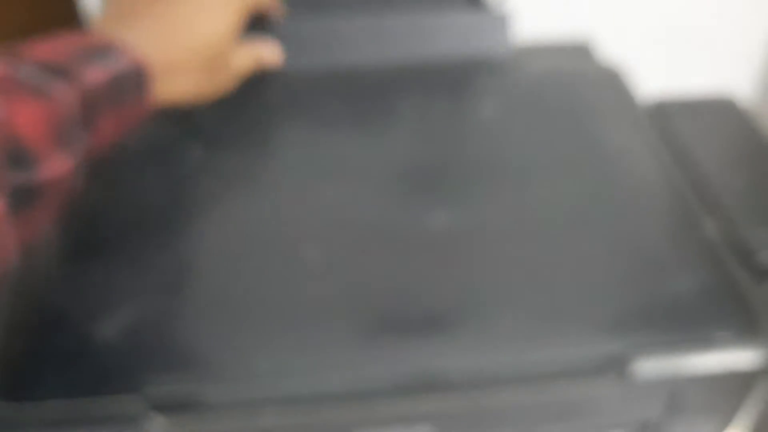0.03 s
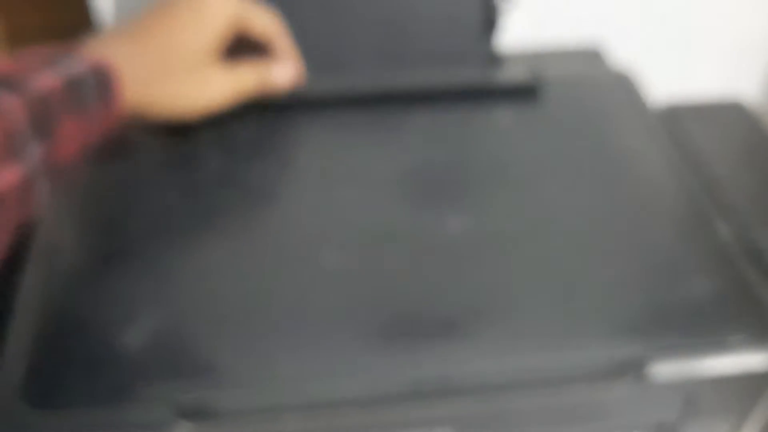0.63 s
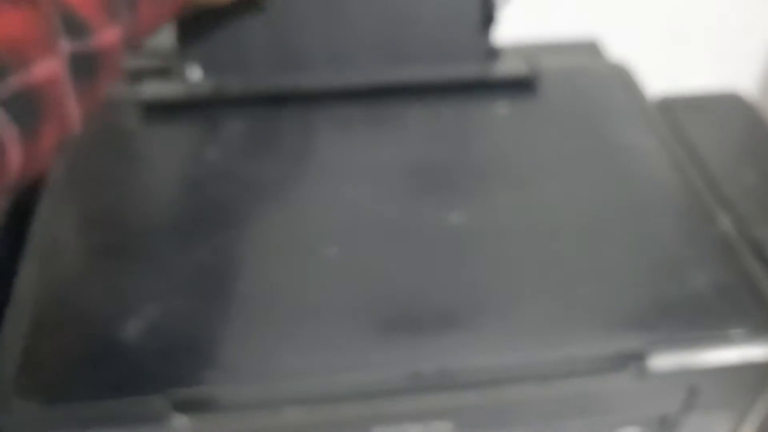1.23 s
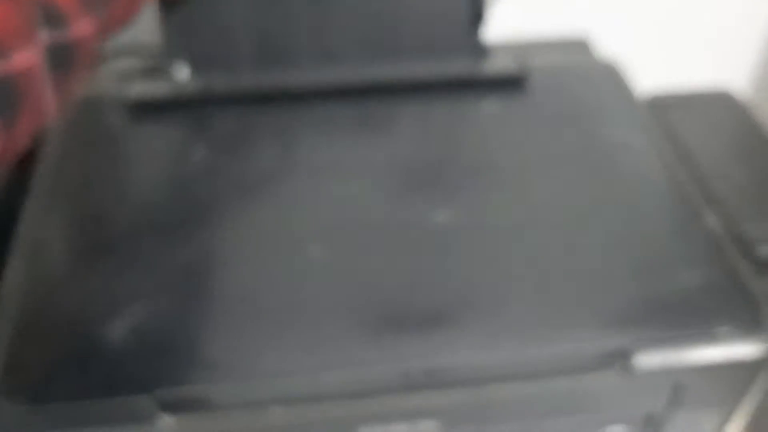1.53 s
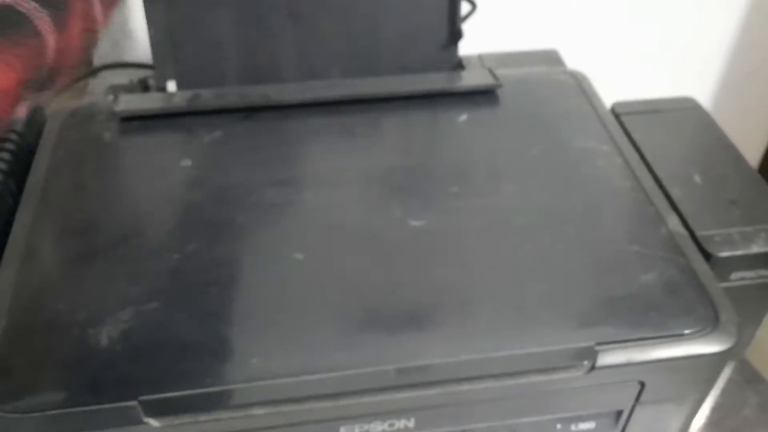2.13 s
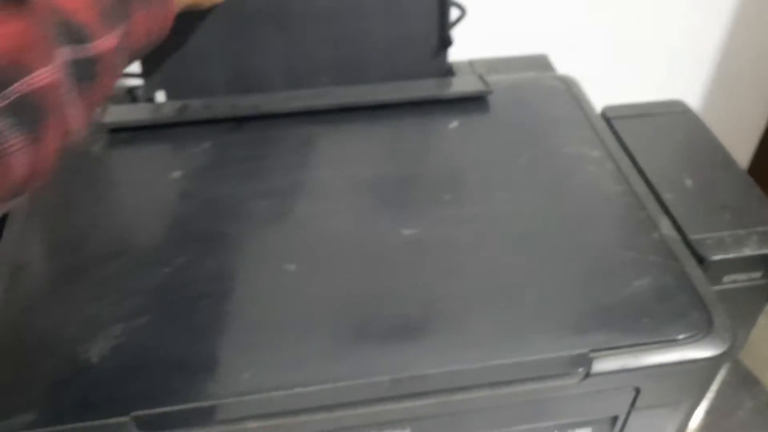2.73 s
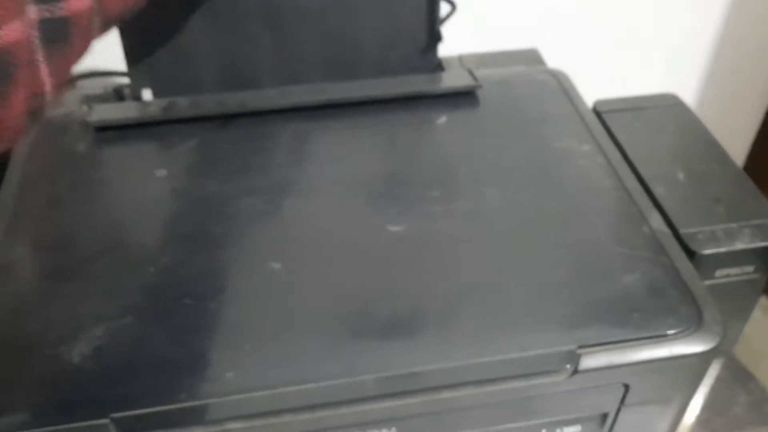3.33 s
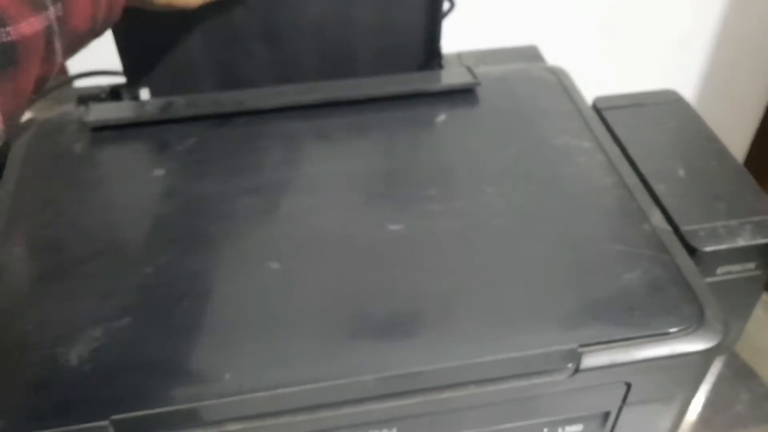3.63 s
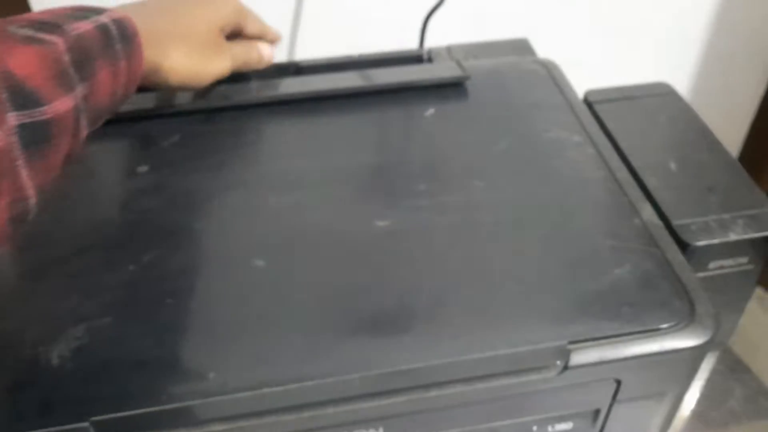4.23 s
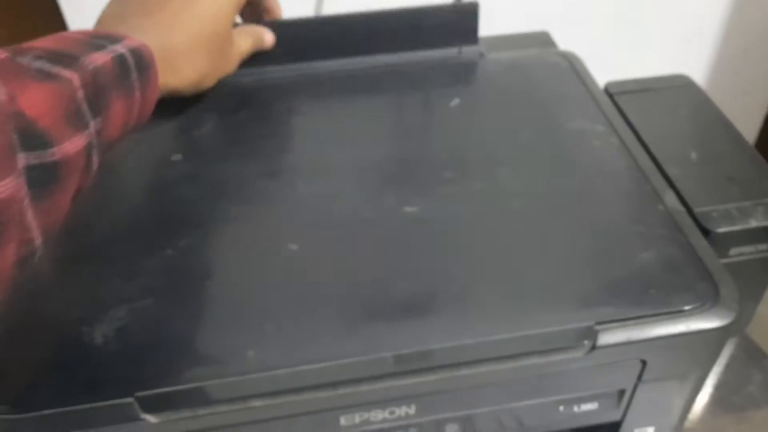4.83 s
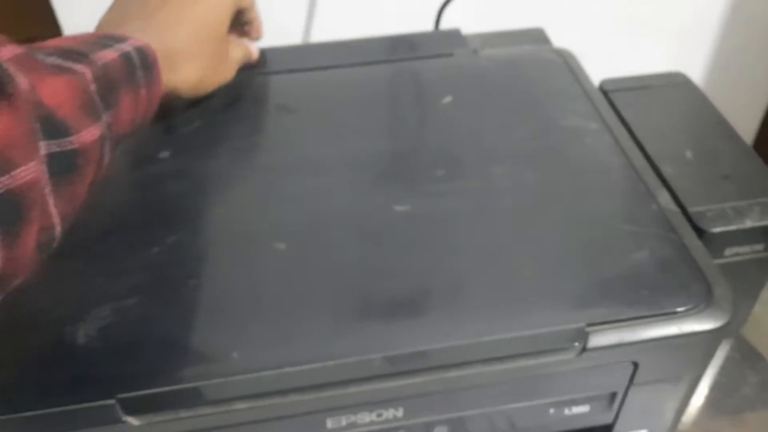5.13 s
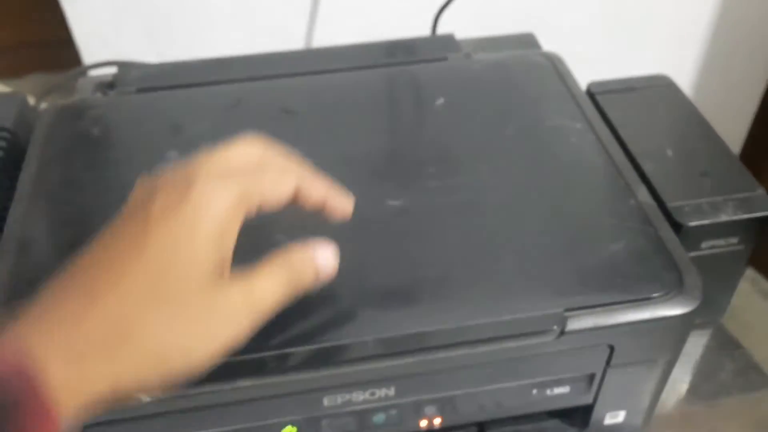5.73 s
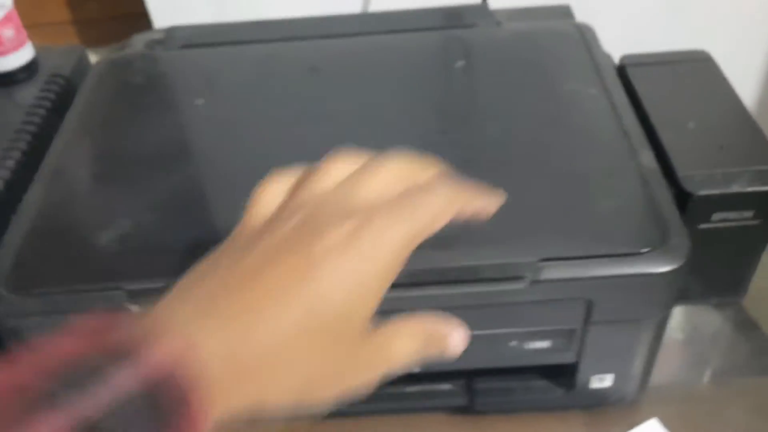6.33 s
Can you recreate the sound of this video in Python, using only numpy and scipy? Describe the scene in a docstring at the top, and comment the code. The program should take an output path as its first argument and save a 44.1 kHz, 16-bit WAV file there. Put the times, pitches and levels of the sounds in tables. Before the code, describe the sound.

Close by in a small, slightly echoing room, thin plastic creaks and ticks as a printer's paper support is gripped. It is pushed down in two short, rasping, juddering slides with light knocks between them, each ending in a clack that thuds through the hollow housing. Then the flap latches with a gentler, lightly ringing click. A faint steady hum and soft brushes of cloth lie underneath.

```python
"""A hand slides a desktop printer's plastic paper support down in two stages and snaps its flap shut.
First, over a faint hum and the rustle of a sleeve, the gripped support creaks and knocks in its slot.
Stick-slip friction makes the guides rasp and judder as it slides to a stop at 2.3 s and again at 4.1 s.
At 5 s the flap latches, rings and pushes out a puff of air. Each impact thuds into the hollow housing
and chatters in the thin panels, and a small hard room reverberates after it."""
import sys
import numpy as np
from scipy import signal
from scipy.fft import rfft, irfft
from scipy.io import wavfile

SR = 44100
rng = np.random.default_rng(int(sys.argv[2]) if len(sys.argv) > 2 else 0)


def digitize_waveform(pressure):
    """Quantize a signal to 16-bit integers and store it at the path in sys.argv[1].

    Rows of a 2-D input are taken as channels; values are limited to [-1, 1].
    """
    field = np.atleast_2d(pressure).T
    bounded = np.clip(field, -1, 1)
    quanta = np.round(bounded * 32767).astype(np.int16)
    wavfile.write(sys.argv[1], SR, quanta)


N = 286650
T = np.arange(N) / SR

# likeness of diffuse sound at the two microphone ports: frequency_hz, correlation
COHERENCE = [(250, 0.92), (550, 0.65), (800, 0.27), (1600, 0.59), (2300, .17), (5000, -.15), (6500, 0.35),
             (8800, 0.42), (15000, 1)]
# colour of the ports, the right one brighter near 5 kHz: frequency_hz, left_minus_right_db
PORT_BALANCE = [(100, 0), (350, -1), (950, 5), (1400, -3), (1900, 1.5), (3200, -3), (5300, -9.5), (9500, 2),
                (15000, -2)]
# reverberation of the room: frequency_hz, t60_s
ROOM_DECAY = [(100, 0.92), (348, .64), (790, .55), (1900, .5), (4200, 0.42), (6630, .42), (12200, .3)]
# spectrum of the room air: frequency_hz, gain_db
AIR_SPECTRUM = [(25, -42.5), (100, -15), (230, -10), (300, -3), (360, -13.5), (540, -11), (750, -22),
                (1150, -27.5), (2100, -29.5), (2900, -38), (5200, -41), (7000, -48), (8100, -41.5),
                (9300, -48), (15500, -44.5)]
# partials of the hum: pitch_hz, level_db
HUM_PARTIALS = [(300.5, -69), (399, -73.5), (574, -80.5), (2126, -91)]
# the background easing as the listener draws back: time_s, gain_db
BACKGROUND_GAIN = [(0, 2.5), (1.5, 5), (4.8, 3), (6.15, -1.5), (6.5, 2)]
# brushes of the sleeve: centre_s, level_db, half_width_s
SLEEVE_BRUSHES = [(0.335, -77.5, .3), (1.496, -78, 0.16), (1.988, -65.5, 0.1), (4.748, -87, 0.049),
                  (5.571, -69, 0.059), (6.479, -80.5, .16)]
# spectrum of rubbing cloth: frequency_hz, gain_db
CLOTH_SPECTRUM = [(200, -22), (1500, -8.5), (5000, 0.5), (8000, 0), (9500, -18), (16000, -2)]

# soft pushes of the hand: start_s, level_db
FINGER_PRESSES = [(1.811, -32.5), (1.929, -28), (2.286, -25), (2.899, -24.5)]
# creaks of the gripped support: centre_s, level_db, half_width_s
SUPPORT_CREAKS = [(.005, -56.5, 0.023), (0.097, -53, 0.01), (0.131, -46.5, 0.0054), (0.194, -48, 0.0014),
                  (0.252, -47, 0.0037), (1.086, -39.5, 0.014), (1.307, -50, 0.0024), (1.539, -68, 0.018),
                  (3.123, -58, 0.0063), (3.299, -48.5, 0.0045), (3.365, -49.5, 0.0027),
                  (3.85, -30.5, 0.0035)]
# groans of the support under the fingers: centre_s, level_db, pitch_hz
SUPPORT_GROANS = [(.135, -34.5, 277), (0.254, -41, 301), (1.114, -42, 345), (1.234, -45.5, 301),
                  (2.733, -47, 280), (2.878, -44, 283), (3.227, -46, 345), (3.41, -49, 328),
                  (3.565, -31, 275), (3.638, -37.5, 275), (3.691, -32.5, 266), (3.83, -35, 323),
                  (4.079, -30.5, 328)]
# pushes that slide the support along its guides: start_s, length_s, judder_db, rasp_db
SLIDE_STROKES = [(-.015, 0.022, -35.5, -40), (0.033, 0.23, -45, -54.5), (1.084, 0.059, -48, -60),
                 (1.916, 0.094, -46.5, -73), (2.207, 0.097, -27, -22.5), (2.308, .18, -37, -36.5),
                 (2.676, 0.075, -44, -58.5), (2.857, 0.047, -33.5, -63), (3.513, .16, -34.5, -42.5),
                 (3.79, 0.65, -42.5, -47), (4.055, 0.071, -50, -43)]
# light knocks of the loose support in its slot: start_s, thud_db, clack_db, click_db
SLOT_KNOCKS = [(0.118, -36.5, -38.5, -54), (.225, -43.5, -68, -51.5), (.249, -61, -50, -56),
               (.325, -48, -46, -67), (1.012, -54, -65, -61), (1.068, -60, -47, -45),
               (1.222, -49, -46, -76), (1.296, -67, -49.5, -61), (1.803, -43, -52, -60.5),
               (1.923, -42.5, -52.5, -65), (2.218, -32, -34.5, -24), (2.480, -46, -47, -33.5),
               (2.731, -59, -39.5, -46), (2.893, -34.5, -33, -34), (2.962, -54, -57.5, -48),
               (3.297, -46, -41.5, -42), (3.391, -46, -41.5, -74), (3.488, -53.5, -55, -50),
               (3.515, -44.5, -34, -36), (3.540, -31.5, -28, -30), (3.664, -46, -37, -40.5),
               (3.741, -54, -56.5, -46.5), (3.817, -38.5, -41, -40), (3.850, -46.5, -42.5, -37.5),
               (3.886, -39.5, -37.5, -45), (4.061, -48, -57, -64)]
# the two end stops, then the latch: start_s, thud_db, clack_db, click_db, tick_db, chatter_decay_s
STOP_IMPACTS = [(2.2803, -17, -18.5, -17, -23, 0.015), (4.1161, -9, -20, -20, -28.5, 0.031),
                (5.0452, -22, -36.5, -32.5, -38, 0.063)]

# normal modes: pitch_hz, level_db, t60_s
SUPPORT_MODES = [(1438, -2, .024), (1890, 7, 0.018), (2275, 2.5, 0.022), (3120, -5.5, 0.038),
                 (3520, -1.5, .016), (4650, -1, 0.029), (4920, -3.5, 0.019), (5186, -8, 0.018),
                 (5750, -6.5, .016)]  # the thin support
FLAP_MODES = [(1875, -33.5, .28), (1975, -39, 0.38), (2015, -45, 0.52), (2095, -41.5, 0.55),
              (4770, -45.5, 0.29), (4915, -33, 0.28), (4960, -39.5, 0.25), (5168, -39, 0.42),
              (6100, -40, .28), (6298, -45, .24), (6627, -33, .15), (6890, -35, .2)]  # the thin flap
HOUSING_MODES = [(94, -21.5, 0.84), (131.06, -12.5, 0.55), (164.65, -14.5, 0.75), (257, -13, 0.11),
                 (275.6, -2, .3), (346.8, -12.5, 0.59), (446.4, -10, .43), (516, -8.5, 0.24),
                 (707, -17.5, 0.57), (746, -22, 0.57), (874, -22, .34), (987, -17, 0.097),
                 (1016.3, -16.5, 0.16), (1150, -27, 0.11)]  # low resonances of housing and room

# spectra of friction and impact: frequency_hz, gain_db
RASP_SPECTRUM = [(100, -27.5), (400, 1.5), (600, 8.5), (1000, 4.5), (1500, 4.5), (2200, 3), (3000, 1),
                 (5000, 0), (8100, -2.5), (9400, -20.5), (11000, -11.5), (13000, -9), (16000, -10.5)]  # guides scraping
JUDDER_SPECTRUM = [(30, -33.5), (70, -21), (100, -8), (160, -10.5), (200, -18.5), (275, 1), (330, -0.5),
                   (400, -8.5), (520, -14), (750, -27), (3000, -57)]  # guides shaking
THUD_SPECTRUM = [(30, -52.5), (70, -31.5), (125, -12), (165, -9), (205, -15), (280, 6), (340, 4.5),
                 (420, 0.5), (520, -7.5), (700, -21), (2000, -44.5), (8000, -88.5)]  # hollow body
CLACK_SPECTRUM = [(150, -43.5), (400, 2.5), (540, 1.5), (690, -0.5), (1000, -0.5), (1350, -3.5),
                  (2500, -21), (8000, -55.5)]  # panels, low range
CLICK_SPECTRUM = [(300, -30), (1000, -16.5), (1550, -2.5), (2200, 5.5), (2900, -1), (4000, -0.5),
                  (5200, -2.5), (8200, -6), (9200, -27.5), (16000, -47.5)]  # panels, middle range
TICK_SPECTRUM = [(2000, -44.5), (7500, -10.5), (8800, -4.5), (9800, -8), (11500, 0), (13000, 3),
                 (16000, -1.5)]  # panels, top range
PUFF_SPECTRUM = [(15, -25), (45, -8.5), (100, 1), (300, -17), (2000, -84)]  # air pushed by the flap


def undb(db):
    """Amplitude grows tenfold for every 20 dB."""
    return 10 ** (np.asarray(db) / 20)


def unit_rms(x):
    """Normalisation to unit mean power."""
    return x / np.sqrt(np.mean(x ** 2))


def add(track, start_s, sound):
    """Superposition: a sound adds to the track from its start time."""
    i = max(int(start_s * SR), 0)
    track[..., i:i + sound.shape[-1]] += sound[..., :N - i]


def swell(centre_s, level_db, half_width_s):
    """A Gaussian envelope, down to 1/e at one half-width from its centre."""
    return undb(level_db) * np.exp(-((T - centre_s) / half_width_s) ** 2)


def response(spectrum, size=4096):
    """Minimum phase: folding the cepstrum gives a causal impulse response with this spectrum."""
    hz, db = np.transpose(spectrum)
    bin_hz = np.arange(size // 2 + 1) * SR / size
    gain = undb(np.interp(np.log(bin_hz + 1), np.log(hz), db))
    cepstrum = irfft(np.log(gain))
    cepstrum[1:size // 2] *= 2
    cepstrum[size // 2 + 1:] = 0
    return irfft(np.exp(rfft(cepstrum)))


def through(x, impulse_response):
    """Convolution: a linear system answers every sample with its impulse response."""
    return signal.oaconvolve(np.atleast_2d(x), np.atleast_2d(impulse_response), axes=1)[:, :N]


def colour(x, spectrum):
    """A filter of unit energy shapes the spectrum and conserves the power of white noise."""
    impulse = response(spectrum)
    return through(x, impulse / np.linalg.norm(impulse))


def diffuse(size):
    """A diffuse field: two flat noise spectra, coherent in the bass and unrelated in the low treble."""
    hz, correlation = np.transpose(COHERENCE)
    coherence = np.interp(np.arange(size // 2 + 1) * SR / size, hz, np.clip(correlation, -1, 1))
    mid, side = rfft(rng.standard_normal((2, size)))
    return np.sqrt((1 + coherence) / 2) * mid + np.outer([1, -1], np.sqrt((1 - coherence) / 2) * side)


def chatter(size, spread_db=4, attack_s=0.0018, grain_samples=32):
    """Directional radiation: buzzing panels face many ways, so each port gets its own share of grains."""
    grain_db = spread_db * rng.standard_normal(size // grain_samples + 1)
    strength = undb(np.repeat(grain_db, grain_samples)[:size])
    grains = unit_rms(irfft(diffuse(size), size) * strength)
    return grains * (1 - np.exp(-T[:size] / attack_s))


def ring(modes, port_lag_s=.00032, max_phase_rad=1.8):
    """Free vibration is a sum of damped sines; higher modes reach the ports further out of phase."""
    t, sound = T[:SR], 0
    for i, (hz, db, t60_s) in enumerate(modes):
        offset = min(2 * np.pi * hz * port_lag_s, max_phase_rad) * (-1) ** i
        phase = 2 * np.pi * hz * t + np.array([[offset], [-offset]]) / 2
        sound = sound + undb(db) * np.sin(phase) * np.exp(-np.log(1000) * t / t60_s)
    return sound


def hum(waver_db=3, drift_rad=1.3):
    """Slow random modulation of amplitude and phase makes each partial waver."""
    sound, knots_s = 0, np.linspace(0, T[-1], 50)
    for hz, db in HUM_PARTIALS:
        waver, drift = (np.interp(T, knots_s, row) for row in rng.standard_normal((2, len(knots_s))))
        amplitude = np.sqrt(2) * undb(db + waver_db * waver)
        sound = sound + amplitude * np.sin(2 * np.pi * hz * T + drift_rad * drift)
    return sound


def sleeve(noise):
    """Friction of cloth radiates swells of bright noise."""
    return colour(noise * sum(swell(*brush) for brush in SLEEVE_BRUSHES), CLOTH_SPECTRUM)


def background(air_db=-65):
    """The noise floor: diffuse room air and hum, superposed with the sleeve."""
    tones = hum()
    noise = irfft(diffuse(N), N)
    steady = undb(air_db) * colour(noise, AIR_SPECTRUM) + tones
    easing = undb(np.interp(T, *np.transpose(BACKGROUND_GAIN)))
    balance = undb([[-2.5], [1.5]])
    return steady * easing * balance + sleeve(noise[:, ::-1])


def room(x, build_s=0.0024):
    """Reverberation: reflections thicken, then decay exponentially at each band's own rate."""
    hz, t60s = np.transpose(ROOM_DECAY)
    noise, t, tail = diffuse(SR), T[:SR], 0
    for weights, t60_s in zip(np.eye(len(hz)), t60s):
        band = irfft(noise * np.interp(np.arange(SR // 2 + 1), hz, weights))
        tail = tail + band * np.exp(-np.log(1000) * t / t60_s)
    tail = tail * (1 - np.exp(-t / build_s))
    return through(x, tail / np.linalg.norm(tail[0]))


def presses(contact_s=0.0045):
    """A long contact has a narrow bandwidth, so a fingertip's force excites only the deepest modes."""
    force, t = np.zeros(N), T[:SR // 20]
    pulse = np.sin(np.pi * np.minimum(t / contact_s, 1)) ** 2
    for start_s, db in FINGER_PRESSES:
        add(force, start_s, -undb(db) * pulse / pulse.sum())
    return force


def creaks(broadband_db=-9):
    """Stick-slip: a pressed joint yields in a quick swell of slips that excite the support's modes."""
    slips, size = np.zeros((2, N)), 8192
    t = T[:size] - size / SR / 2
    for centre_s, db, half_width_s in SUPPORT_CREAKS:
        envelope = undb(db) * np.exp(-(t / half_width_s) ** 2)
        add(slips, centre_s + t[0], envelope * chatter(size, spread_db=6))
    body = ring(SUPPORT_MODES)
    ringing = through(slips, body / np.linalg.norm(body[0]))
    return ringing + undb(broadband_db) * colour(slips, CLICK_SPECTRUM)


def groans(half_width_s=0.012):
    """Slow stick-slip sets the support oscillating for a few cycles."""
    return sum(swell(centre_s, db, half_width_s) * np.sin(2 * np.pi * (hz * (T - centre_s) + rng.random()))
               for centre_s, db, hz in SUPPORT_GROANS)


def stroke(start_s, length_s, attack_s=.016, sag_db_per_s=35.5, release_s=.016):
    """The envelope of one push: a linear rise, an exponential sag and a short release."""
    t = np.maximum(T - start_s, 0)
    rise = np.minimum(t / attack_s, 1)
    release = np.exp(-np.maximum(t - length_s, 0) / release_s)
    return rise * undb(-sag_db_per_s * t) * release


def guides(grip_db=6.5, grip_hz=110, judder_db=-2, rasp_db=-1):
    """Sliding friction catches and lets go unevenly. Returns the shaking force and the sound."""
    roughness = np.interp(T * grip_hz, np.arange(4096), rng.standard_normal(4096))
    grip = unit_rms(undb(grip_db * roughness))
    shaking, scraping = sum(np.outer(undb(levels_db), stroke(start_s, length_s))
                            for start_s, length_s, *levels_db in SLIDE_STROKES)
    force = rng.standard_normal(N) * shaking
    rasp = colour(chatter(N, spread_db=3) * grip * scraping, RASP_SPECTRUM)
    return force, undb(judder_db) * colour(force, JUDDER_SPECTRUM) + undb(rasp_db) * rasp


def flap(latch_s=5.045, puff_db=-11.5, puff_hz=51.7, puff_decay_s=.014):
    """The latching flap vibrates freely and displaces air at the right port. Returns ring and puff."""
    ringing, puff, t = np.zeros((2, N)), np.zeros(N), T[:SR]
    add(ringing, latch_s, ring(FLAP_MODES))
    pressure = -undb(puff_db) * np.cos(2 * np.pi * puff_hz * t) * np.exp(-t / puff_decay_s)
    add(puff, latch_s, through(pressure, response(PUFF_SPECTRUM))[0])
    return ringing, puff * undb([[-16], [0]])


def housing(force, gain_db=-3, radiating_band_hz=(85, 2000)):
    """Forced vibration of the housing's modes; a small box radiates little deep bass."""
    vibration = undb(gain_db) * through(force, ring(HOUSING_MODES))
    radiation = signal.butter(3, radiating_band_hz, "band", fs=SR, output="sos")
    return signal.sosfilt(radiation, vibration)


def impacts(thud_gain_db=25, panel_gain_db=4, knock_decay_s=.0068, tick_re_click_db=-17):
    """Impulse excitation: the body thuds and loose panels chatter. Returns force, thud and panels."""
    force, panels, size = np.zeros(N), np.zeros((2, N)), 8192
    responses = map(response, (CLACK_SPECTRUM, CLICK_SPECTRUM, TICK_SPECTRUM))
    ranges = np.array([undb(panel_gain_db) * h / np.linalg.norm(h) for h in responses])
    knocks = [(start_s, thud_db, clack_db, click_db, click_db + tick_re_click_db, knock_decay_s)
              for start_s, thud_db, clack_db, click_db in SLOT_KNOCKS]
    for start_s, thud_db, *ranges_db, decay_s in STOP_IMPACTS + knocks:
        add(force, start_s, -undb([thud_db]))
        burst = chatter(size) * np.exp(-T[:size] / decay_s)
        add(panels, start_s, through(burst, undb(ranges_db) @ ranges))
    return force, undb(thud_gain_db) * colour(force, THUD_SPECTRUM), panels


def scene(shake_db=-30, wet_db=-3.5, thud_wet_db=-10):
    """Superposition: blows, fingers and judder drive one housing; the room answers the sharper sounds."""
    impact_force, thud, panels = impacts()
    sliding_force, sliding = guides()
    flap_ring, puff = flap()
    resonance = housing(impact_force + presses() + undb(shake_db) * sliding_force)
    direct = panels + sliding + flap_ring + creaks() + groans()
    reflections = room(undb(wet_db) * direct[0] + undb(thud_wet_db) * thud)
    return direct + thud + resonance + reflections + puff + background()


def record(dry, cutoff_hz=15900):
    """Each port filters the sound, soft saturation rounds the peaks and a low-pass cuts the top."""
    ports = [response([(hz, sign * db / 2) for hz, db in PORT_BALANCE]) for sign in (1, -1)]
    rounded = np.tanh(through(dry, ports))
    return signal.sosfilt(signal.ellip(10, .2, 80, cutoff_hz, fs=SR, output="sos"), rounded)


dry = scene()
out = record(dry)
digitize_waveform(out)
```